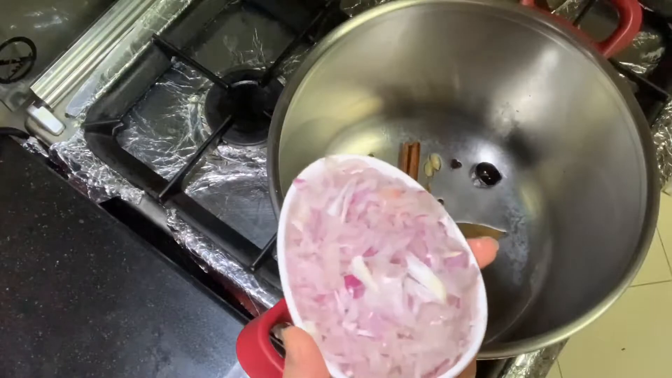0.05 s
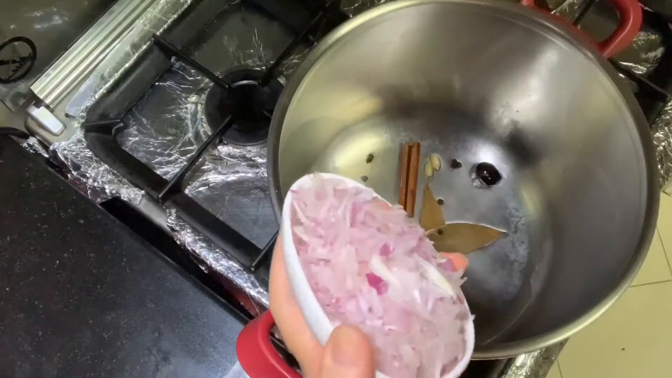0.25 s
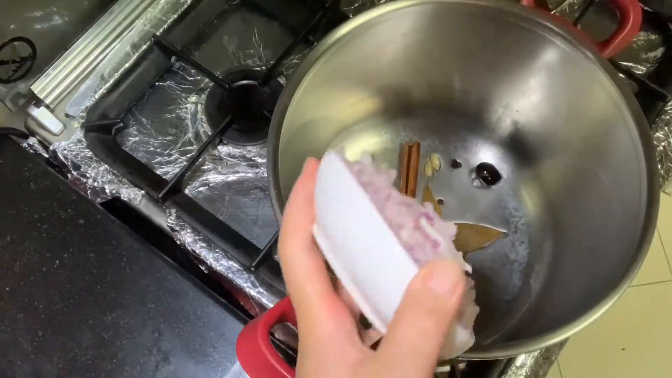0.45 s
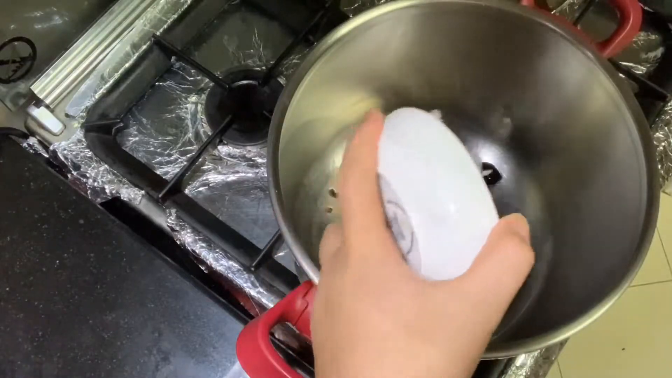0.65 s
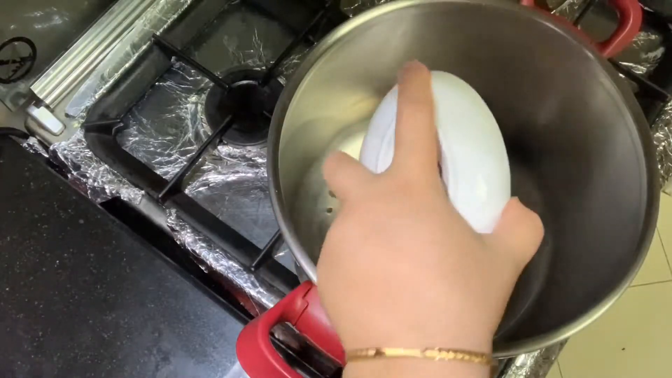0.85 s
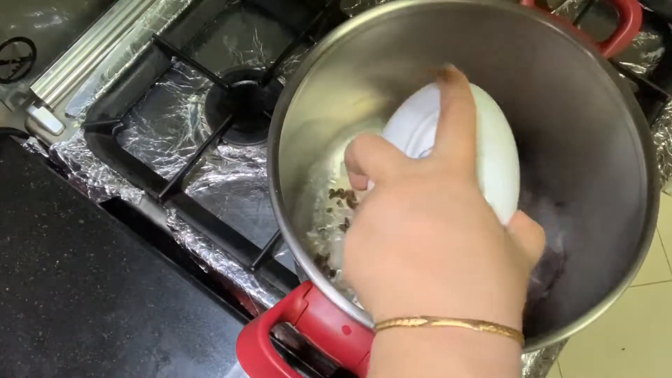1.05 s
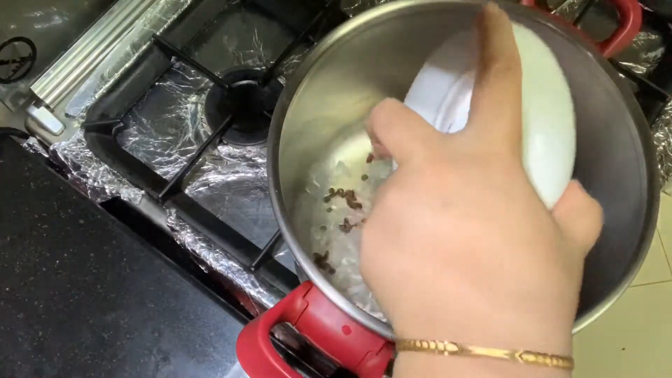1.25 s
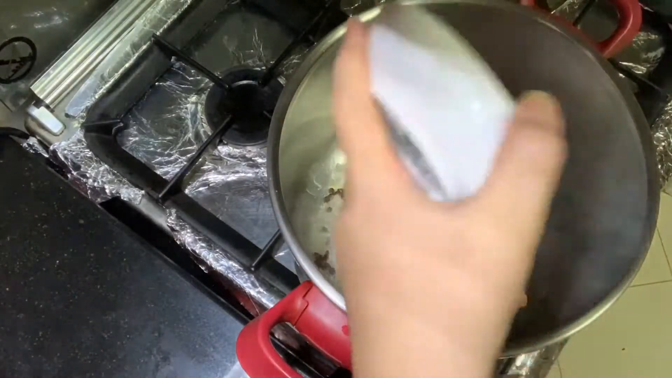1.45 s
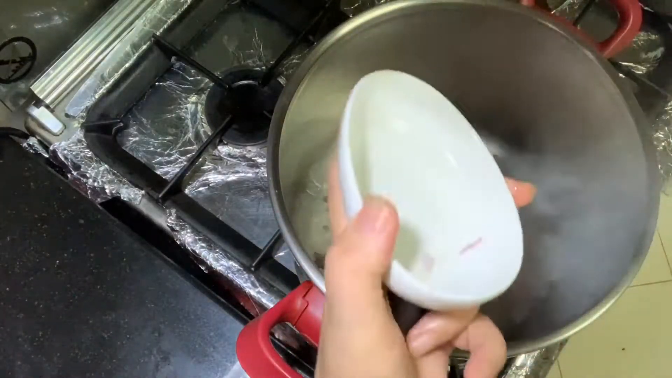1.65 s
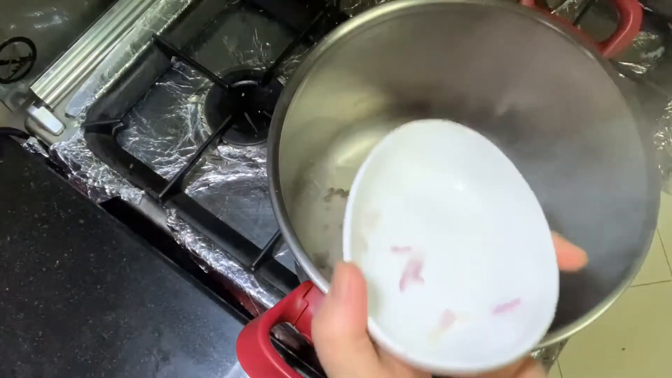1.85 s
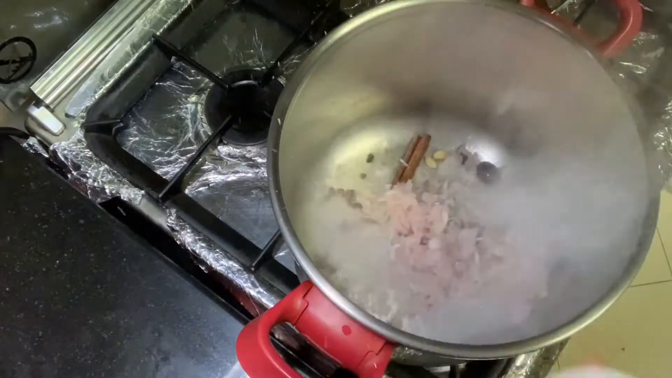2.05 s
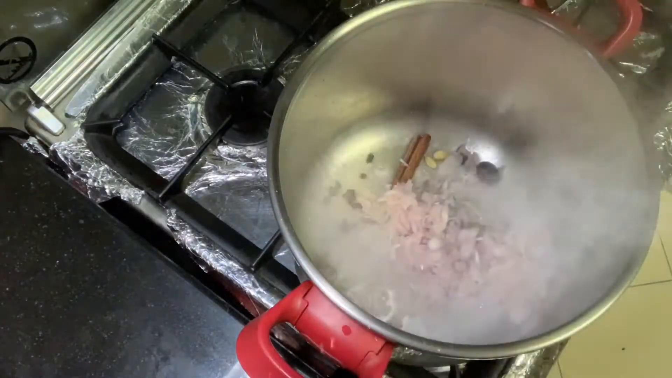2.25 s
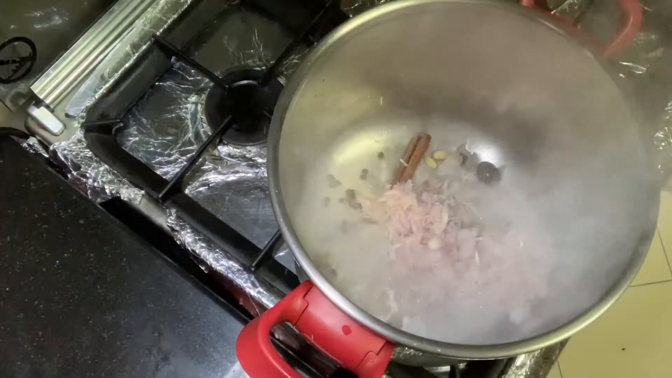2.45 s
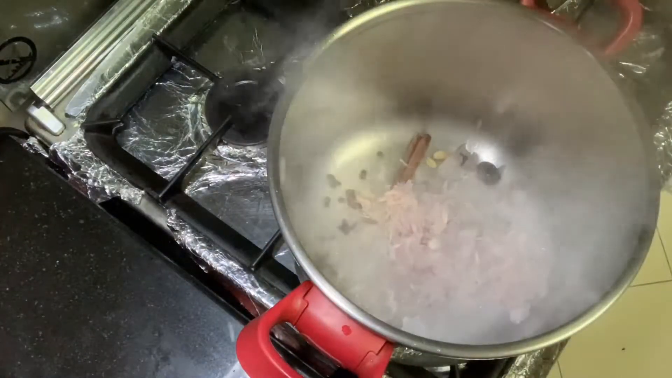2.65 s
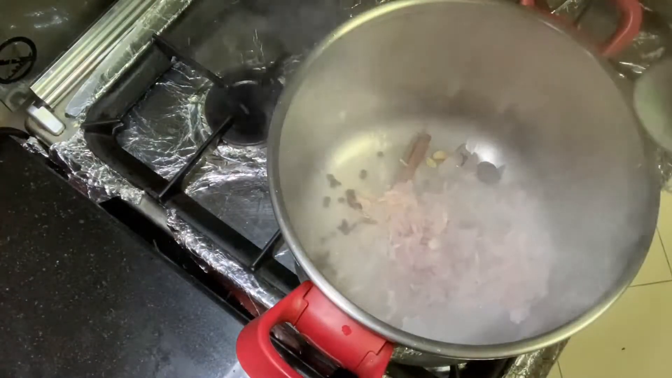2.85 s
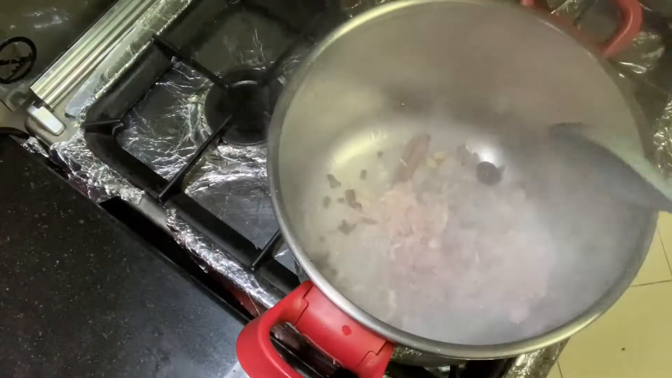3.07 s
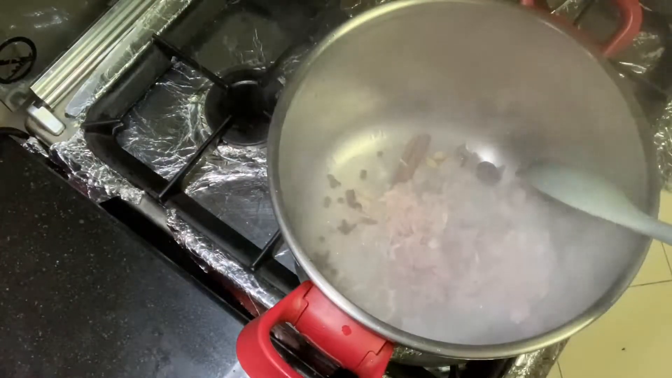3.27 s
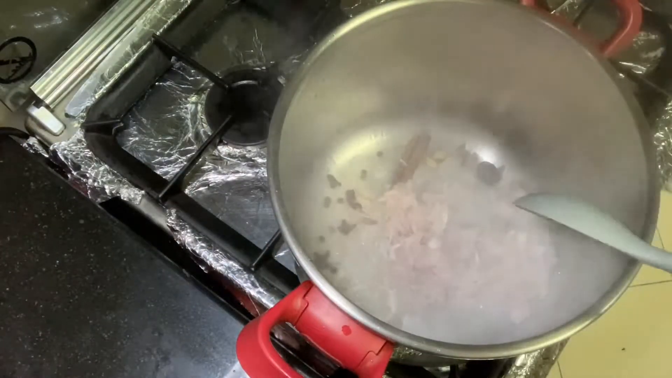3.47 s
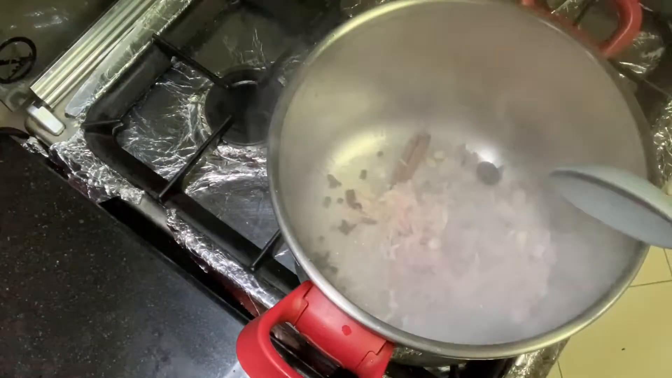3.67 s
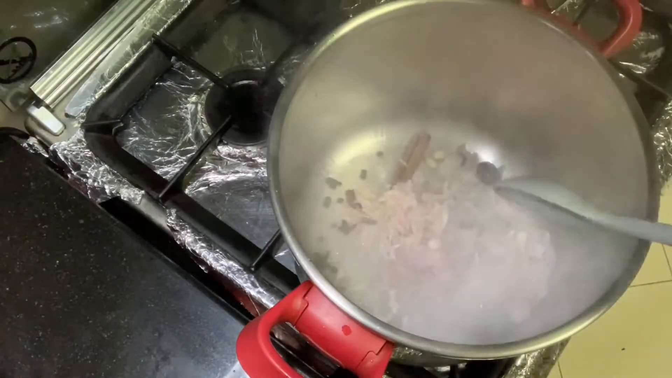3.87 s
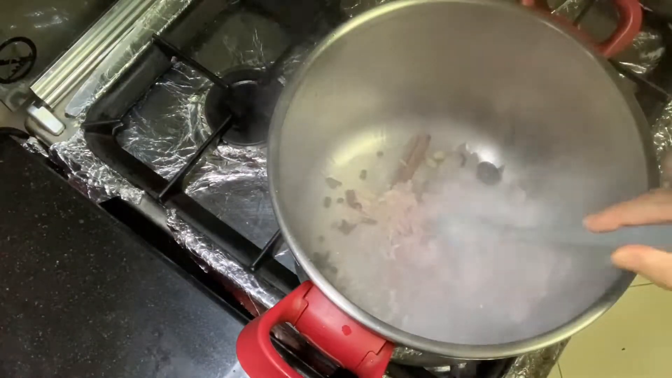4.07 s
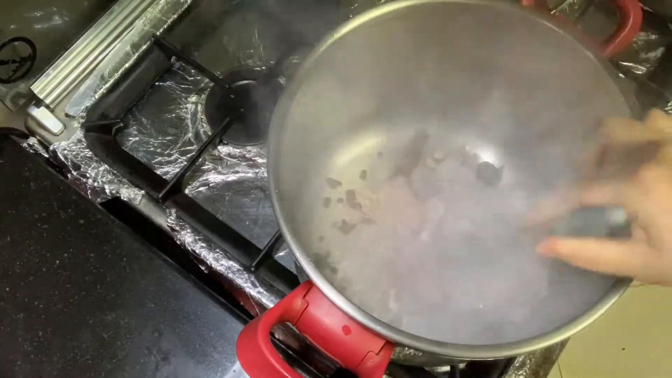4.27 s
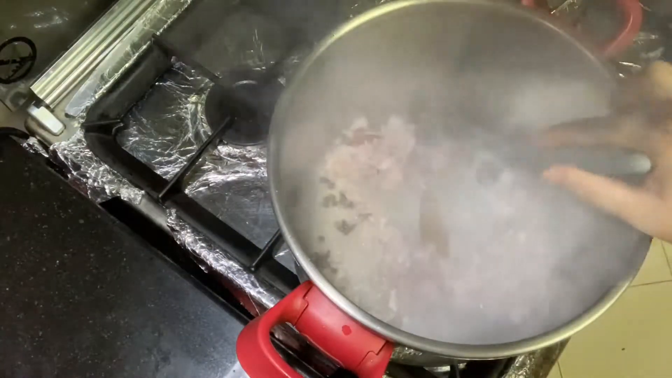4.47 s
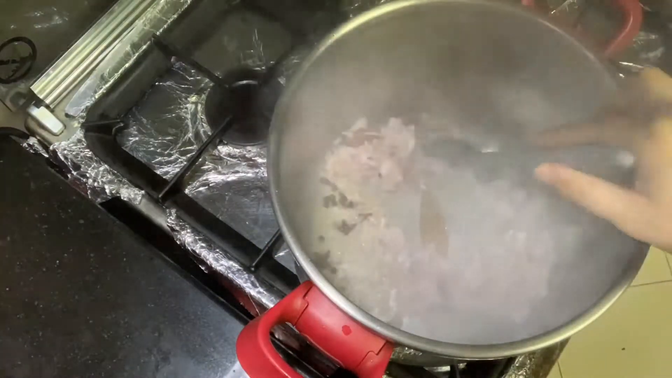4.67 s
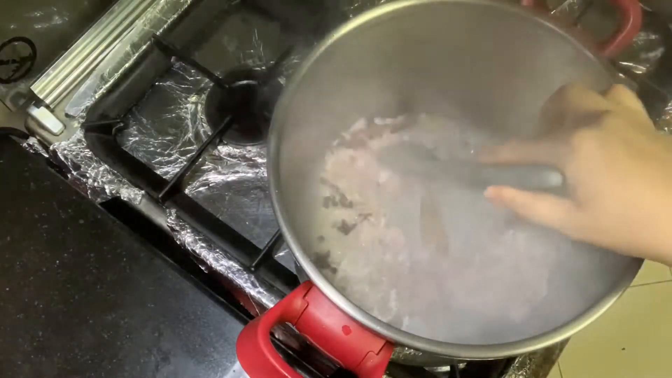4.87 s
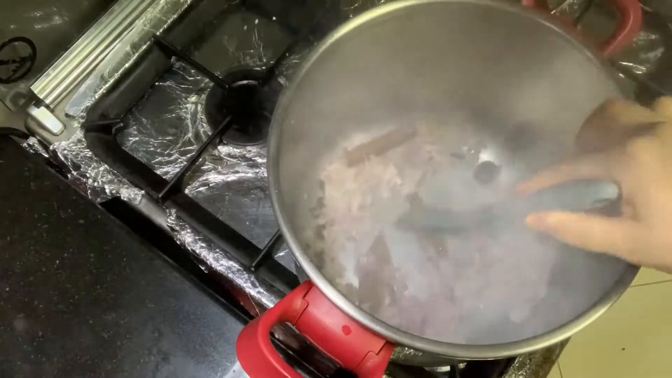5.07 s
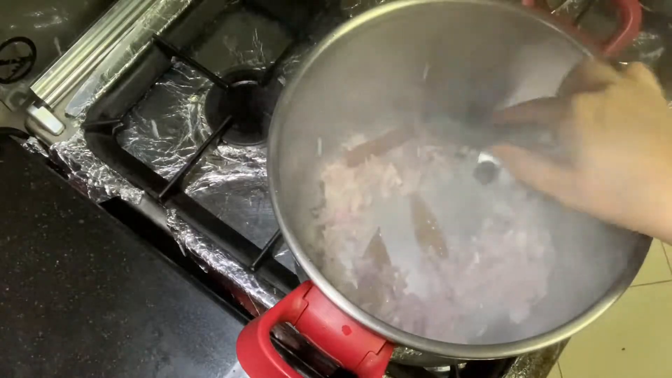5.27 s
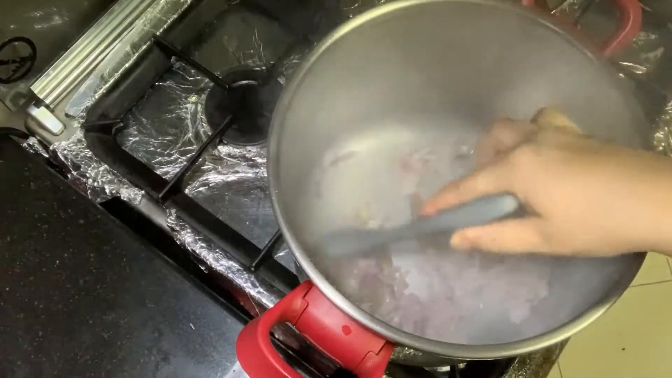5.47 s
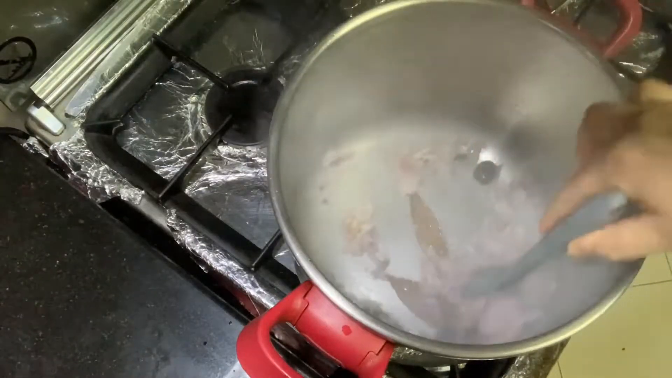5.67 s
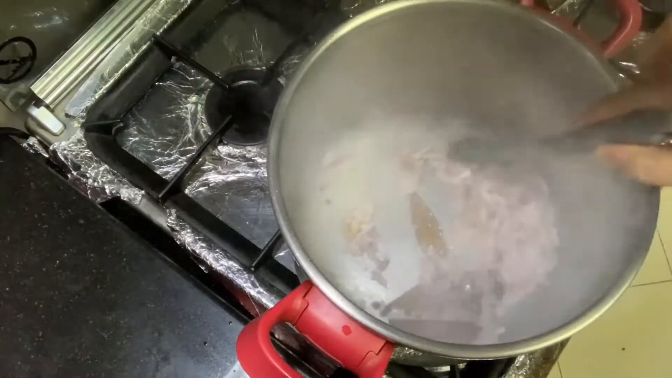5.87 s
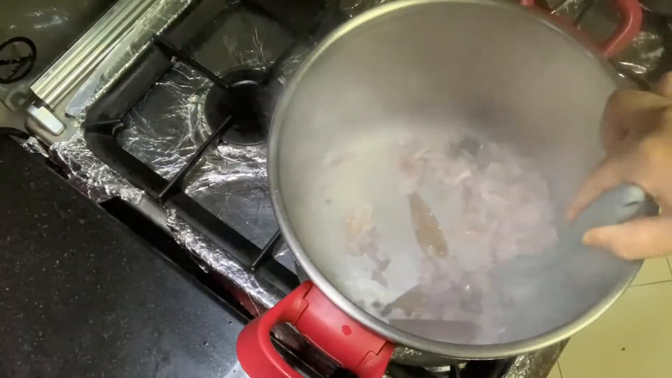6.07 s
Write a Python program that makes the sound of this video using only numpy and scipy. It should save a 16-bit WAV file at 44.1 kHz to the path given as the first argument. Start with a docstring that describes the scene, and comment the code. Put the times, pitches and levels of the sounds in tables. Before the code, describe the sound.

Close stereo sound in a kitchen: low rumble and a faint simmer, then a brief spit and onion landing in hot oil in a deep steel pot. A fierce hissing sizzle erupts over hollow bubbling, with sharp pops. It eases gradually, one tap lands near the right of the microphone, then spatula strokes raise a coarse wet crackle to the end.

```python
"""A fierce bright sizzle over a duller boil: chopped onion drops into hot oil in a deep steel pot, heard
close by in stereo. Steam bubbles are random clicks, coloured by size; the large ones ring the air in
the pot. Big drops pop as noise cracks plus a push on the air, and wet strokes of a spatula crackle.
One tap, a chirp sliding down to a thud, lands near the right port of the microphone.
A low kitchen rumble of filtered noise sinks once the sizzle starts."""
import sys
import numpy as np
from scipy import signal
from scipy.fft import rfft, irfft, next_fast_len
from scipy.io import wavfile
from scipy.ndimage import uniform_filter1d

SR = 44100
rng = np.random.default_rng(int(sys.argv[2]) if len(sys.argv) > 2 else 0)


def dump_mix(stems):
    """Bounce the given channels to the path in sys.argv[1] as a 16-bit WAV at rate SR."""
    frames = np.atleast_2d(stems).T  # one column per channel
    limited = np.clip(frames, -1, 1)  # hard clip at full scale
    pcm = np.round(limited * 32767).astype(np.int16)
    wavfile.write(sys.argv[1], SR, pcm)


def boost_factor(decibels):
    """Convert a level in decibels to a linear amplitude factor."""
    exponent = np.asarray(decibels, float) / 20
    return 10 ** exponent


N = 270023
SIZE = next_fast_len(N + 8192)
HZ = np.fft.rfftfreq(SIZE, 1 / SR)
T = np.arange(N) / SR
LANDING_S = 0.841  # the heap of onion strikes the bottom

# colour of fine bubbles: [f/Hz, relative density/dB]
FINE_COLOUR = [(3000, -30), (6000, -9), (7800, -5), (8300, 0), (10000, 0), (12000, -1.5), (14000, 0),
               (15000, -1), (15700, -2.5), (16000, -10)]
# colour of middle bubbles: [f/Hz, relative density/dB]
MIDDLE_COLOUR = [(1000, -20), (2000, -31), (3000, -3), (3600, -1.5), (3900, 1), (4200, 0), (4600, -1),
                 (6500, -3), (8000, -6), (12000, -51)]


def evened(x):
    """Scales to rms 1."""
    return x / np.sqrt(np.mean(x ** 2) + 1e-20)


def read(points):
    """Interpolates a [f/Hz, level/dB] table on a log-frequency axis."""
    f, db = np.transpose(points)
    return np.interp(np.log(HZ + 1), np.log(f + 1), db)


def causal(db):
    """Minimum-phase filter of this colour, by cepstral folding: it rings only after each click."""
    fold = irfft(np.log(boost_factor(np.maximum(db, -100))), SIZE)
    fold[1:SIZE // 2] *= 2
    fold[SIZE // 2 + 1:] = 0
    return np.exp(rfft(fold))


def stereo(shared, left, right, scatter=1):
    """Mixes a shared spectrum with one per channel, then sets level and phase differences by frequency."""
    # stereo width by frequency: [f/Hz, share alike in both channels, right lead/rad, left - right/dB]
    width_rows = [(0, .98, 0, 5.5), (120, .93, .25, 3.8), (220, .72, .6, 2.5), (350, .72, 1.5, -5),
                  (550, .7, 1.3, -1), (900, .78, 1.7, -3), (1300, .72, .9, -1.5), (1800, .65, 2.2, -1),
                  (2500, .5, 2.2, -1), (3100, .45, 3.2, -1.2), (3600, .25, 4.2, -1.5), (6800, .15, 8.3, 0),
                  (7200, .45, 9.4, 0), (8200, .45, 9, 2), (11000, .74, 6.6, .5), (11150, 1, 2 * np.pi, 0),
                  (13000, 1, 2 * np.pi, 0), (13150, .6, 5.7, 0), (14300, .6, 4.6, 0), (14800, .78, 3.3, 0),
                  (15200, 1, np.pi, 0)]
    f, alike, lead_rad, left_right_db = np.transpose(width_rows)
    alike = np.clip(np.interp(HZ, f, alike), 0, 1) ** scatter
    phase = np.exp(-0.5j * np.interp(HZ, f, lead_rad))
    side = boost_factor(np.interp(HZ, f, left_right_db) / 2) * phase
    pair = np.sqrt(alike) * shared + np.sqrt(1 - alike) * np.array([left, right])
    return pair * np.array([side, 1 / side])


def heard(clicks, db, scatter=1):
    """Three click or noise trains, coloured and mixed to stereo at rms 1."""
    return evened(irfft(stereo(*rfft(clicks, SIZE), scatter) * causal(db), SIZE)[:, :N])


def bursts(per_s, spread_db):
    """Bubble bursts as sparse signed clicks, exponential in dB: a few much larger than the rest."""
    size = boost_factor(spread_db * np.minimum(rng.exponential(1, (3, N)), 6))
    sign = rng.choice([-1., 1.], (3, N))
    return size * sign * (rng.random((3, N)) < per_s / SR)


def wander(seconds):
    """Slow random drift of rms 1: noise smoothed twice."""
    span = max(round(seconds * SR), 1)
    once = uniform_filter1d(rng.standard_normal(N), span)
    return evened(uniform_filter1d(once, span))


def patchy(x, depth_db):
    """Narrow bands of the sound swell and sink at random, each on its own."""
    bins, steps = 2, 16  # size of a patch: bands of 86 Hz, steps of 3 ms
    z = signal.stft(x, nperseg=512, noverlap=384)[2]
    patches = uniform_filter1d(rng.standard_normal(z.shape[:0:-1]), steps, 0)
    patches = evened(uniform_filter1d(patches, bins, 1)).T
    return evened(signal.istft(z * boost_factor(depth_db * patches), nperseg=512, noverlap=384)[1][:, :N])


def pot_db():
    """The boil's colour/dB with the air and wall resonances of the pot added in power."""
    # colour of large bubbles: [f/Hz, relative density/dB]
    large_colour = [(120, -40.5), (220, -16.5), (330, -5.5), (600, -19.5), (800, -13), (1500, -1),
                    (2200, -7.5), (3000, -3), (5000, -39.5)]
    # pot resonances: [f/Hz, width/Hz, lift/dB]
    resonances = [(189, 16.4, 18), (362.5, 31, 14.5), (440.7, 17.4, 16.5), (513, 32, 14.5), (663, 29, 17),
                  (949, 81, 17.5), (1040.5, 20, 17.5), (1292, 33, 14), (1509, 135, 11.5), (1912, 28, 12.5),
                  (2148, 12, 21), (2580, 160, 10.5)]
    lift = sum(boost_factor(db) ** 2 / (1 + (2 * (HZ - hz) / width_hz) ** 2) for hz, width_hz, db in resonances)
    return read(large_colour) + 10 * np.log10(1 + lift)


def blow(s, db, hz, t60_s):
    """A struck mode: one sine dying exponentially."""
    t = np.maximum(T - s, 0)
    return boost_factor(db - 60 * t / t60_s) * np.sin(2 * np.pi * hz * t)


def kitchen():
    """Room rumble, noise with fuzzy tones that sinks, over the oil's faint simmer of small clicks."""
    # rumble colour: [f/Hz, relative density/dB]
    rumble_colour = [(20, -50), (31, -33), (39, -0.5), (48, -4), (66, 3), (95, -5.5), (123, -5), (165, -15),
                     (290, -14.5), (400, -21), (800, -26.5), (2000, -32), (3000, -40)]
    # fuzzy tones in the rumble: [lift/dB, f/Hz, width/Hz]
    hum_rows = [(4, 124.5, 7.7), (5, 199, 15), (3, 330, 17), (8, 2009, 90)]
    # oil before and under the onion: [f/Hz, relative density/dB]
    simmer_colour = [(1500, 0.5), (2200, -9), (3000, 1.5), (5500, -14), (7500, -5), (8500, -2), (11000, 1),
                     (13500, -4), (15600, -5), (16000, -24)]
    rumble_db, sunk_db, simmer_db = -41.5, -56.5, -58.5
    sink_s, sink_length_s = 0.92, 0.076
    hums = sum(db / (1 + (2 * (HZ - hz) / width_hz) ** 2) for db, hz, width_hz in hum_rows)
    sunk = np.clip((T - sink_s) / sink_length_s, 0, 1)
    rumble = heard(rng.standard_normal((3, N)), read(rumble_colour) + hums)
    rumble = rumble * boost_factor(rumble_db + (sunk_db - rumble_db) * sunk)
    simmer = heard(bursts(per_s=7200, spread_db=3.5), read(simmer_colour), scatter=3.7)
    return rumble + patchy(simmer, depth_db=1.6) * boost_factor(simmer_db)


def tonal_grains():
    """Short notes of 14 cycles, slightly rising, scattered at random times; rms 1."""
    out = np.zeros((3, N))
    for hz in np.geomspace(1700, 9000, 24):
        t = np.arange(round(14 * SR / hz)) / SR
        note = np.sin(2 * np.pi * hz * t * (1 + 0.034 * t / t[-1])) * np.hanning(len(t))
        out += signal.oaconvolve(bursts(per_s=30, spread_db=2.5), note[None], axes=1)[:, :N]
    return evened(irfft(stereo(*rfft(out, SIZE)), SIZE)[:, :N])


def first_spit():
    """Level of the hiss as the first piece touches the oil: a brief peak, then a faint rest until landing."""
    spit_s, rise_s, t60_s = 0.796, 0.0079, 0.058
    peak = boost_factor(-27 - 60 * abs(T - spit_s) / t60_s)
    rest = boost_factor(-44) * (T < LANDING_S)
    return np.clip((T - spit_s) / rise_s, 0, 1) * (peak + rest)


def sizzle():
    """Fine bubbles hiss in the treble, large ones ring the pot; after a first spit all start at landing."""
    # boil-off and bubble size: [t/s, relative level/dB, coarseness/dB]
    boil_off = [(0.85, -25, -1), (0.88, -21, 5.5), (0.91, -16, -3.5), (0.945, -20.5, 0), (0.985, -19.5, 2),
                (1.02, -21.5, 4), (1.1, -20.5, 2), (1.155, -18.5, 4.5), (1.172, -24.5, 3), (1.64, -27, 4.5),
                (1.71, -26, 5.5), (1.74, -27, 5), (2.15, -25, 4.5), (2.17, -26.5, 3), (2.7, -27.5, 0.5),
                (3.1, -27.5, -1), (3.45, -28.5, -2), (3.9, -30.5, -0.5), (4.22, -32.5, 2.5),
                (4.36, -29.5, 2.5), (4.55, -28, 0.5), (4.85, -28.5, 1), (4.95, -26.5, -1.5),
                (5.27, -26.5, -1.5), (5.58, -28.5, 1), (5.76, -24.5, -3), (6.05, -24.5, 0), (6.12, -25, -4)]
    s, boil_db, coarse_db = np.transpose(boil_off)
    level = np.clip((T - LANDING_S) / 0.0084, 0, 1) * boost_factor(np.interp(T, s, boil_db))
    coarse_db = np.interp(T, s, coarse_db)
    fresh_db = 4.5 * np.exp(-abs(T - LANDING_S) / 0.18)  # surge while the onion is freshly wet
    fine = level * boost_factor(2)
    middle = level * boost_factor(-8 + 0.35 * coarse_db + fresh_db)
    large = level * boost_factor(-16 + 0.92 * coarse_db)
    spit = first_spit()

    clumps = wander(0.0094)  # bursts of every size crowd together
    fizz_clicks = bursts(per_s=7000, spread_db=0.5) * boost_factor(0.33 * clumps)
    sputter_clicks = bursts(per_s=6000, spread_db=2.5) * boost_factor(0.66 * clumps + 0.21 * wander(0.12))
    boil_clicks = bursts(per_s=1500, spread_db=1.0) * boost_factor(0.22 * clumps + 1.28 * wander(0.28))
    fizz = heard(fizz_clicks, read(FINE_COLOUR))
    sputter = heard(sputter_clicks, read(MIDDLE_COLOUR))
    boil = heard(boil_clicks, pot_db())

    # tiny spits snap out of the hiss
    snap = rng.choice([-1., 1.], (1, 120)) * boost_factor(-60 * T[:120] / 0.0047)
    spits = signal.oaconvolve(bursts(per_s=220, spread_db=2.0), snap, axes=1)[:, :N]
    fizz = evened(fizz + boost_factor(-12.5) * heard(spits, read(FINE_COLOUR)))

    out = patchy(fizz, depth_db=1.76) * (fine + spit)
    out += patchy(sputter, depth_db=2.53) * (middle + 0.15 * spit)
    out += patchy(boil, depth_db=2.27) * large
    return out + boost_factor(-11.0) * tonal_grains() * middle


def landing():
    """The heap strikes the bottom: one ring of the steel."""
    return blow(LANDING_S, db=-37.5, hz=777, t60_s=0.31)


def small_pops():
    """Lesser drops at random moments, as rows [t/s, relative low/dB, relative high/dB]."""
    count, spread_db = 20, 2
    when_s = rng.uniform(LANDING_S, T[-400], count)
    low, high = spread_db * rng.standard_normal((count, 2)).T
    return list(zip(when_s, -43 + low, -25 + high))


def pops():
    """Each drop is a crack of a millisecond or two and a push on the pot's air that the walls scatter."""
    # largest drops, each bursting 1.3 ms after t: [t/s, relative low part/dB, relative high part/dB]
    big_drops = [(0.911, -28, -17), (0.976, -32, -19), (1.056, -34, -17), (1.073, -23, -25),
                 (1.125, -38, -21), (1.147, -32, -20), (1.203, -20, -15), (1.407, -24.5, -22),
                 (1.426, -40, -31), (1.517, -35, -22), (1.714, -38, -17.5), (1.736, -23, -32),
                 (1.949, -20, -19), (2.01, -21, -19), (2.064, -37, -24), (2.1, -26, -28), (2.151, -16, -25),
                 (2.267, -28, -25), (2.367, -28, -27), (2.384, -30, -30), (2.438, -24, -41),
                 (2.4575, -20.5, -15.5), (2.493, -19, -26), (2.598, -26.5, -32), (2.671, -33, -21),
                 (2.7715, -22, -23), (3.077, -28, -21), (3.119, -35, -26), (3.219, -31, -28),
                 (3.594, -32, -21), (4.366, -27, -27), (4.455, -22.5, -29), (4.53, -22, -25),
                 (4.773, -36, -24), (4.801, -28.5, -22), (4.998, -26, -32), (5.027, -32, -27),
                 (5.033, -38, -23), (5.091, -23, -20), (5.127, -27, -19), (5.243, -30, -29),
                 (5.613, -40, -21), (5.648, -40, -24), (5.854, -47, -19), (5.875, -40, -20),
                 (5.902, -42, -16), (5.917, -40, -16), (6.043, -26, -25), (6.048, -40, -17.5),
                 (6.103, -24.5, -24)]
    # air shoved by a pop: [f/Hz, relative density/dB]
    push_colour = [(120, -19), (300, 0), (700, 4), (1100, 12), (1800, 7), (3000, 15), (5000, -40)]
    pop_ring = 0.81  # weight of the pot's colour against the plain push, in dB
    high, low, t = np.zeros((3, N)), np.zeros((3, N)), np.arange(300) / SR
    drops = big_drops + small_pops()
    for (s, low_db, high_db), noise in zip(drops, rng.standard_normal((len(drops), 3, 300))):
        at = round((s + 0.0013) * SR)
        crack = np.sign(noise) * np.minimum(t / 0.00011, 1) * boost_factor(-60 * t / 0.0025)
        start_rms = np.sqrt(np.mean(crack[:, :24] ** 2))  # first half millisecond
        high[:, at:at + 300] += boost_factor(high_db) * crack / start_rms
        low[0, at:at + 7] += boost_factor(low_db + 2.0) * np.hanning(7)
        low[1:, at:at + 300] += boost_factor(low_db - 10 - 60 * t / 0.028) * noise[1:]  # scattered tail
    bright = causal(np.maximum(read(FINE_COLOUR), read(MIDDLE_COLOUR) - 11)) * boost_factor(9)
    dull = causal(pop_ring * pot_db() + (1 - pop_ring) * read(push_colour)) * boost_factor(5.5)
    return irfft(stereo(*rfft(high, SIZE)) * bright + stereo(*rfft(low, SIZE)) * dull, SIZE)[:, :N]


def knock():
    """A sharp tap near the right port: treble first, pitch sliding down, then a thud alike at both ports."""
    knock_s = 3.367
    t = np.maximum(T - knock_s, 0)
    spread = 1 + t / 0.00025  # pitch falls from 4 kHz as 1 / spread
    tick = -np.minimum(t / 0.0005, 1) * np.cos(2 * np.pi * np.log(spread)) * spread ** -1.05
    u = ((T - knock_s - 0.0006) / 0.00012) ** 2
    snap = (2 * u - 1) * np.exp(-u)
    port_gain = boost_factor([[-29], [-13]])  # left, right
    thud = blow(knock_s + 0.006, db=-36, hz=59, t60_s=0.11)
    return thud + (0.5 * tick + 0.45 * snap) * port_gain


def stirring():
    """The spatula turns wet onion onto bare hot steel: a coarse crackle swells and dies at each stroke."""
    # strokes: [start/s, rise/s, level/dB, t60/s]
    strokes = [(4.3, 0.17, -36.5, 3.2), (4.93, 0.11, -60, 1.5), (5.68, 0.075, -36.5, 1.3)]
    # water flashing off: [f/Hz, relative density/dB]
    flash_colour = [(700, -25), (1000, -3), (1800, -4), (2700, -2), (3400, 3.5), (5000, 2.5), (8000, -32)]
    level = np.zeros(N)
    for s, rise_s, db, t60_s in strokes:
        decay_db = -60 * np.maximum(T - s - rise_s, 0) / t60_s
        level += np.clip((T - s) / rise_s, 0, 1) * boost_factor(db + decay_db)
    return level * heard(bursts(per_s=1200, spread_db=2.0), read(flash_colour))


def scene():
    """All sources, summed in stereo."""
    return kitchen() + sizzle() + landing() + pops() + knock() + stirring()


def roll_off(x):
    """The treble ends steeply here."""
    return signal.sosfilt(signal.butter(12, 15800, fs=SR, output="sos"), x)


def record(dry):
    """Returns the finished mix as processed by roll_off()."""
    return roll_off(dry)


dry = scene()
out = record(dry)
dump_mix(out)
```